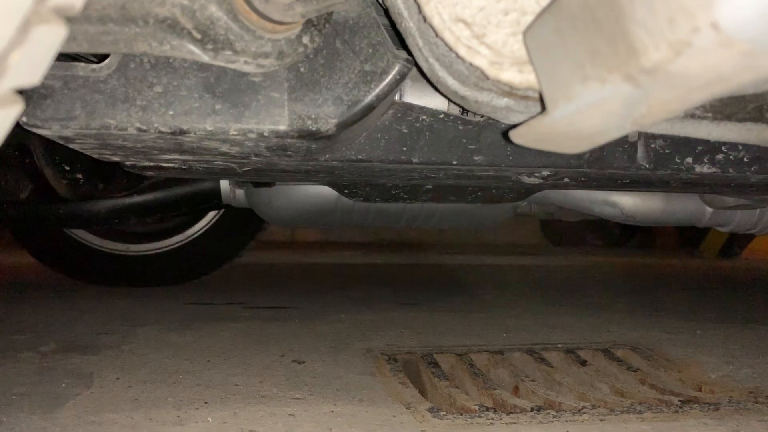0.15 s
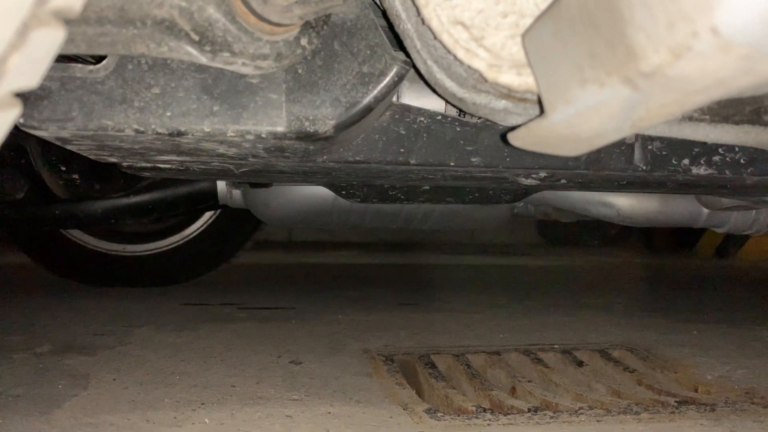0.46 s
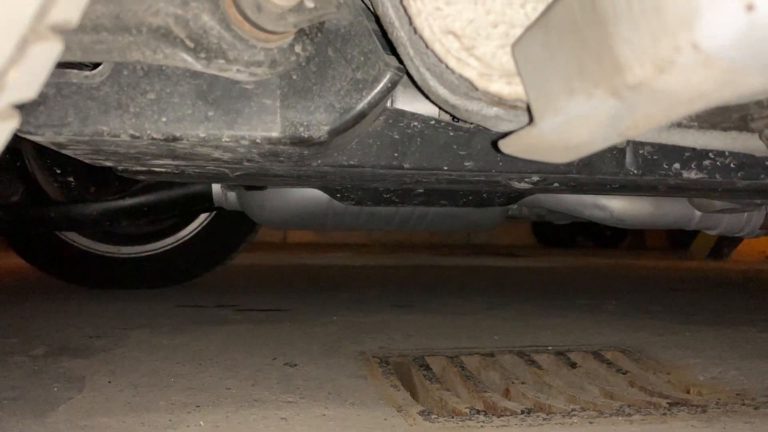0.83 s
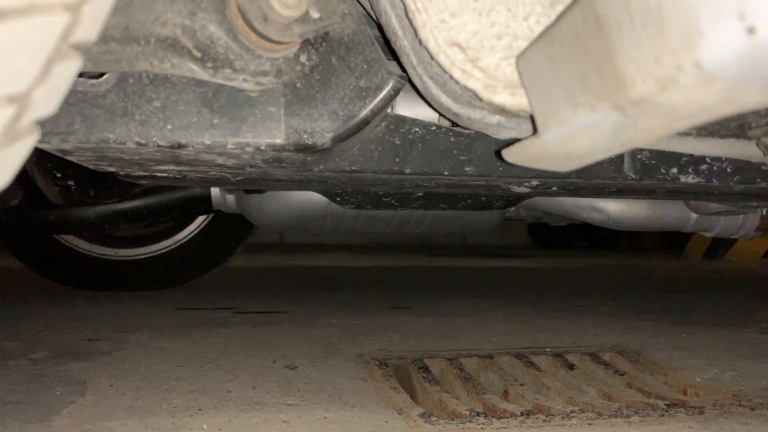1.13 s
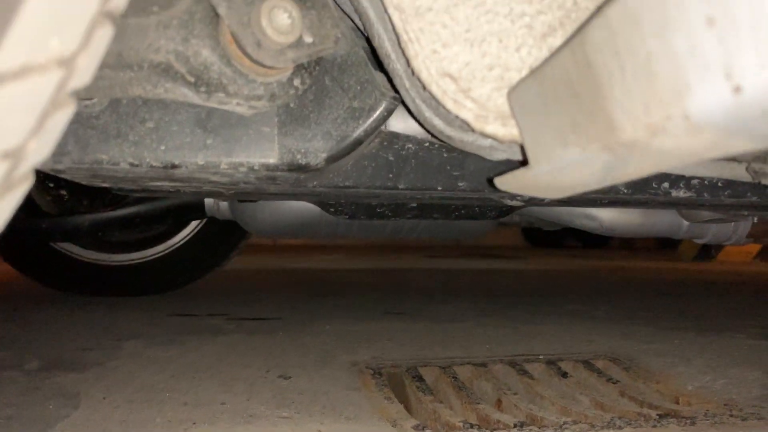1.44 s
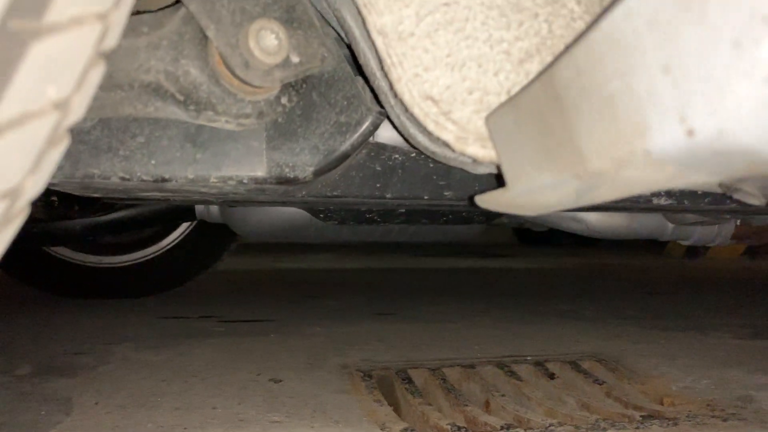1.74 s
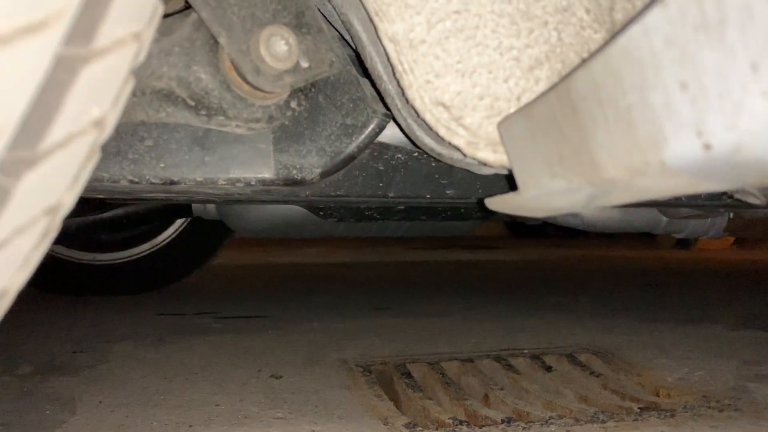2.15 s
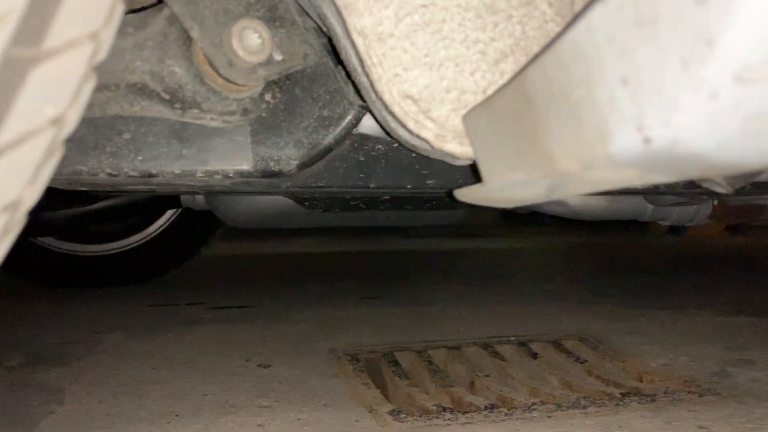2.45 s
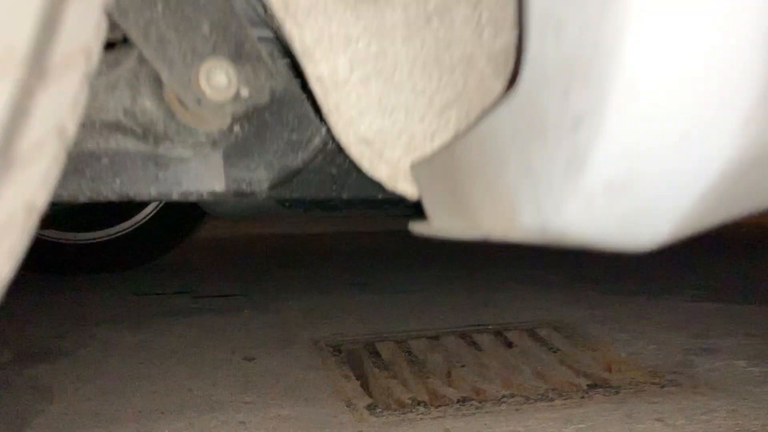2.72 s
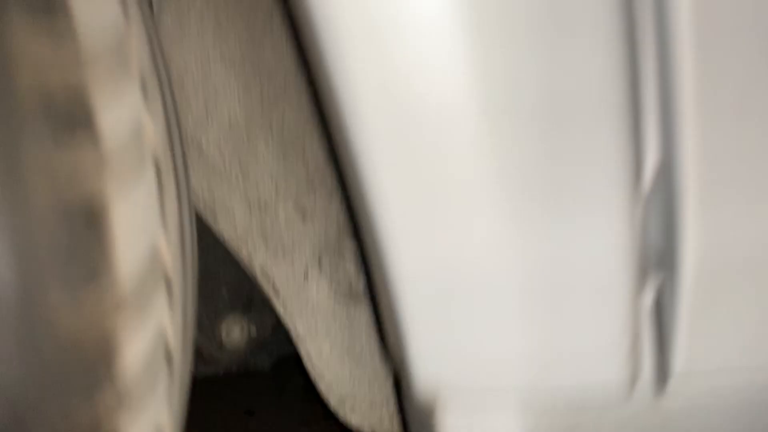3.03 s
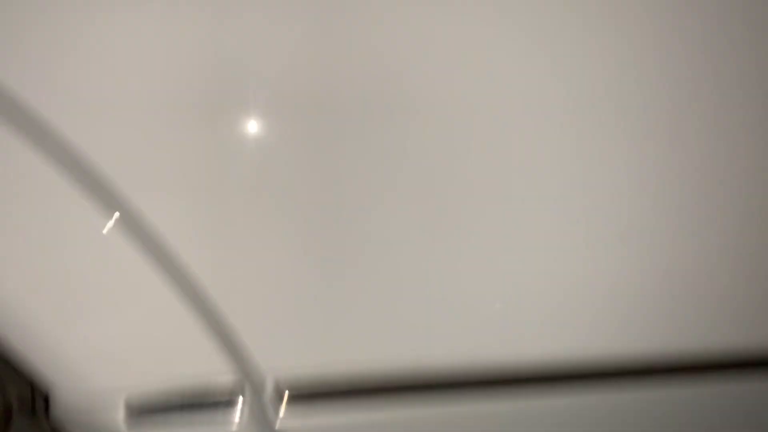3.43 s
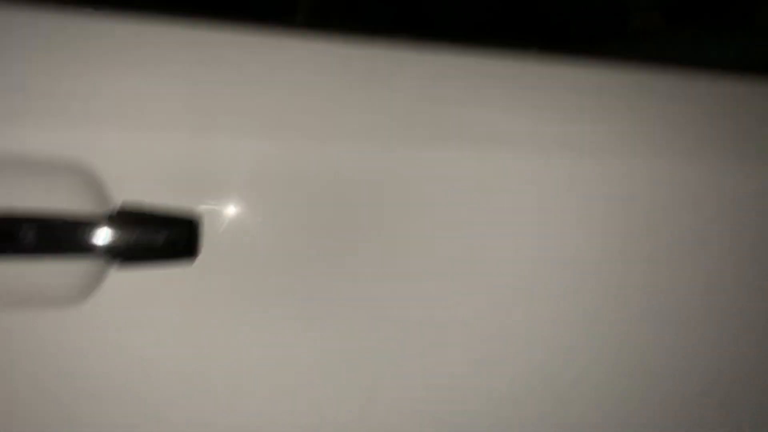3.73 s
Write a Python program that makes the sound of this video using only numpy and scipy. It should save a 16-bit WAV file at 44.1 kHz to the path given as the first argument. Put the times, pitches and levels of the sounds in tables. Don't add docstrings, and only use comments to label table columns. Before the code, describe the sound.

A parked car hums with a deep wavering drone, pump throb and rushing, hissing air, heard close beneath the wheel arch in a garage; near the end the phone lifts away and the sound drops, with a brief hand scuff.

```python
import sys
import numpy as np
from scipy import signal
from scipy.fft import rfft, irfft, next_fast_len
from scipy.io import wavfile
from scipy.ndimage import uniform_filter1d

SR = 44100
rng = np.random.default_rng(int(sys.argv[2]) if len(sys.argv) > 2 else 0)


def amplitude_ratio(level_db):
    exponent = np.asarray(level_db, float) / 20
    return 10 ** exponent


def generate_wav(signal):
    frames = np.transpose(np.atleast_2d(signal))
    scaled = np.clip(frames, -1, 1) * 32767
    pcm = np.round(scaled).astype(np.int16)
    wavfile.write(sys.argv[1], SR, pcm)


N = 171108

# (time [s], level [dB])
NEARNESS = [
    (0, 1.5),
    (1.5, 0.5),
    (2.4, 0.5),
    (2.8, -1),
    (3.05, -4),
    (3.3, -3.5),
    (3.55, -13),
    (3.88, -16.5),
]


def evened(x):
    return x / np.sqrt(np.mean(x ** 2) + 1e-20)


def read(points, hz):
    f, value = np.transpose(points)
    return np.interp(np.log(hz + 1), np.log(f + 1), value)


def curve(points, t):
    return np.interp(t, *np.transpose(points))


def drift(rate_hz, t):
    f = np.geomspace(rate_hz / 20, rate_hz, 20)
    phase = rng.random(20)
    coarse = np.linspace(0, t[-1], 800)
    waves = np.sin(2 * np.pi * (f * coarse[:, None] + phase)) / np.sqrt(f)
    return np.interp(t, coarse, evened(waves.sum(1)))


def resonate(x, hz, width):
    turn = np.exp(2j * np.pi * hz * np.arange(x.shape[-1]) / SR)
    r = np.exp(-np.pi * width * 1.55 / SR)
    return 2 * (turn * signal.lfilter([(1 - r) ** 2], [1, -2 * r, r * r], x / turn)).real


def ripple(size, smooth):
    return 3 * evened(uniform_filter1d(rng.standard_normal(size), size=smooth))[:, None]


def random_spectrum(level_db, size):
    real, imaginary = rng.standard_normal((2, 2, *level_db.shape))
    z = (real + 1j * imaginary) * amplitude_ratio(level_db) * np.sqrt(SR / size * 1.5)
    return signal.istft(z, nperseg=size, noverlap=size * 3 // 4)[1][:, :N]


def gusty_level(db, share, t):
    return amplitude_ratio(db + share * curve(NEARNESS, t) + 2.05 * drift(8, t))


def drone(t):
    # (time [s], frequency [Hz])
    drone_hz = [(0, 42.5), (.2, 45.05), (.27, 46.5), (.34, 42.35), (.85, 43.42), (1.2, 42.9), (1.45, 44.5),
                (1.65, 42.4), (1.9, 44), (2.15, 43.73), (2.5, 43.57), (2.8, 43.5), (3, 43.1), (3.88, 43.25)]
    # (time [s], level [dB])
    drone_db = [(0.0, -21), (0.05, -21.5), (0.18, -27), (0.45, -20), (0.62, -21), (1.1, -19), (1.3, -20.5),
                (1.38, -24), (1.54, -24.5), (1.65, -20), (1.8, -21), (2.11, -26), (2.46, -22), (2.77, -23),
                (3.01, -20), (3.77, -21), (3.84, -20), (3.88, -19)]
    cycles = np.cumsum(curve(drone_hz, t)) / SR
    return np.sqrt(2) * amplitude_ratio(curve(drone_db, t)) * np.sin(2 * np.pi * (cycles + 0.26))


def pump(t):
    # (shaft multiple, level [dB], share of load)
    orders = [(.593, -45, 0), (1, -44, .1), (2, -45, .2), (3, -46.5, .2), (4, -42.5, 1), (9, -49, .2),
              (12.5, -53, .2), (18, -57, .2)]
    # (time [s], level [dB])
    load_db = [(0, 3.5), (.22, -2), (.4, 2.5), (.68, 0), (.8, 1), (1.05, -11), (1.15, 2), (1.42, -2.5),
               (1.75, 3), (2.0, -1), (2.08, -3), (2.2, 0.5), (2.55, 3.5), (2.7, -2.5), (2.88, 5),
               (3.0, -10), (3.88, -4)]
    shaft_hz = 49.07 * (1 + 0.00404 * drift(3.496, t))
    turns = np.cumsum(shaft_hz) / SR
    load = curve(load_db, t)
    lines = np.zeros(N)
    for multiple, db, share in orders:
        swell = amplitude_ratio(db + share * load + 1.5 * drift(5.37, t))
        lines += swell * np.sin(2 * np.pi * (multiple * turns + rng.random()))
    return np.sqrt(2) * lines * amplitude_ratio(0.15 * curve(NEARNESS, t))


def whines(t):
    # (frequency [Hz], level [dB])
    motor_tones = [(1145, -48.5), (2738, -58), (2951, -63), (5756, -65)]
    tone = np.zeros(N)
    for hz, db in motor_tones:
        jittered = t + .00004 * drift(3.77, t)
        tone += amplitude_ratio(db + 4 * drift(7.45, t)) * np.sin(2 * np.pi * hz * jittered)
    balance = np.array([1.2 + 0 * t, np.clip((t - 2.9) * 5, -.9, .5)])
    return np.sqrt(2) * tone * amplitude_ratio(1.3 * curve(NEARNESS, t)) * balance


def surges(t):
    # (time [s], level [dB], frequency [Hz], spread [s])
    main_swells = [(0.047, -32, 396, 0.015), (0.082, -29, 395, 0.0062), (0.211, -23, 399, 0.01),
                   (0.275, -35, 420, 0.0066), (0.354, -32.1, 405, 0.0043), (0.446, -28.1, 392, 0.014),
                   (0.556, -29.5, 406, 0.007), (0.595, -31, 420, 0.01), (0.681, -32, 408, 0.0077),
                   (0.727, -27, 402, 0.018), (0.786, -28.5, 395, 0.01), (0.853, -25.5, 396, 0.018),
                   (1.007, -29, 409, 0.0075), (1.07, -27, 387, 0.008), (1.313, -32, 390, 0.009),
                   (1.38, -27.5, 400, 0.0067), (1.432, -26.5, 406, 0.016), (1.51, -32, 394, 0.017),
                   (1.581, -32.4, 417, 0.022), (1.638, -32, 404, 0.013), (1.701, -28, 411, 0.0063),
                   (1.747, -30.5, 394, 0.036), (1.786, -25.5, 400, 0.011), (1.872, -35, 395, 0.019),
                   (2.015, -28.5, 399, 0.016), (2.149, -28.5, 396, 0.011), (2.231, -37, 399, 0.013),
                   (2.296, -32.5, 410, 0.011), (2.357, -25, 396, 0.012), (2.532, -32.4, 396.5, 0.023),
                   (2.654, -24, 394, 0.022), (2.69, -31.5, 407, 0.022), (2.888, -31.5, 405, 0.013),
                   (2.923, -33.8, 406, 0.012), (3.015, -37, 404, 0.0068), (3.05, -38.3, 391, 0.0083),
                   (3.121, -39.3, 395, 0.021), (3.198, -41, 417, 0.012), (3.264, -46, 396.7, 0.017),
                   (3.346, -37.4, 407, 0.011), (3.402, -44, 405.4, 0.008), (3.445, -36, 380, 0.007),
                   (3.505, -43.5, 386, 0.027), (3.57, -44, 394, 0.023), (3.641, -42.1, 422, 0.008),
                   (3.697, -37, 406, 0.0054), (3.799, -37, 391, 0.017), (3.859, -45, 391.7, 0.02)]
    # (time [s], level [dB], frequency [Hz], spread [s])
    low_swells = [(0.136, -38.5, 286, 0.028), (0.374, -46, 297, 0.014), (0.566, -39.5, 281, 0.018),
                  (0.709, -42, 296, 0.011), (0.907, -51, 302, 0.012), (1.028, -40.3, 292, 0.0099),
                  (1.183, -45, 283, 0.014), (1.254, -47, 300, 0.025), (1.33, -39, 316, 0.015),
                  (1.504, -39.5, 299, 0.015), (1.575, -42, 284, 0.017), (1.779, -43, 304, 0.018),
                  (1.881, -43, 290, 0.012), (2.001, -36.5, 290, 0.013), (2.082, -41, 289, 0.025),
                  (2.204, -45, 300, 0.019), (2.299, -36, 290, 0.0098), (2.402, -37, 287, 0.012),
                  (2.618, -35.1, 285, 0.016), (2.731, -35.6, 297, 0.0092), (2.795, -46, 295, 0.023),
                  (2.888, -39.9, 284.2, 0.013), (3.028, -40, 286, 0.029), (3.128, -51, 293, 0.021),
                  (3.219, -46, 292, 0.014), (3.305, -51, 286, 0.013), (3.421, -40, 293, 0.014),
                  (3.568, -50, 295, 0.013), (3.634, -49.1, 290, 0.015), (3.813, -47, 297, 0.026)]
    out = np.zeros(N)
    for s, db, hz, spread in main_swells + low_swells:
        span = slice(max(round((s - 4 * spread) * SR), 0), round((s + 4 * spread) * SR))
        since = t[span] - s
        swell = amplitude_ratio(db) * np.exp(-.5 * (since / spread) ** 2)
        out[span] += np.sqrt(2) * swell * np.sin(2 * np.pi * hz * since)
    return out


def roar(t):
    # (frequency [Hz], level [dB per Hz])
    roar_db = [(15, -57), (35, -62), (60, -53), (110, -57.5), (240, -63), (560, -62), (720, -71.5),
               (1500, -79)]
    # (frequency [Hz], share)
    roar_follow = [(60, 0.14), (150, 0.031), (350, 0.46), (1000, 0.58)]
    # (frequency [Hz], width [Hz], level [dB], share of nearness)
    cavities = [(399, 21.6, -41, 1), (290, 53, -51.5, 0.78), (438.7, 9.4, -45, 0.99),
                (2247, 280, -49.5, 0.33), (5245, 46, -57.5, 0.73), (7205, 17, -54.5, 1.3)]
    hz = np.fft.rfftfreq(4096, 1 / SR)[:, None]
    near = curve(NEARNESS, np.arange(N // 1024 + 5) * 1024 / SR)
    hush = -8 * np.exp(-.5 * ((hz - 198) / 16) ** 2)
    level = read(roar_db, hz) + read(roar_follow, hz) * near + ripple(size=2049, smooth=2) + hush
    out = random_spectrum(level, 4096)
    gust = rng.standard_normal((2, N))
    for f, width, db, share in cavities:
        out = out + gusty_level(db, share, t) * evened(resonate(gust, f, width))
    return out


def aimed(t):
    # (frequency [Hz], width [Hz], level [dB], share of nearness, side over mid)
    aimed_cavities = [(585, 68, -49.5, 0.56, 1.6), (849.6, 103, -45.5, 0.28, 0.58),
                      (1119, 81, -47.5, 0.18, 0.67), (1228, 19, -52, 0.59, 0.42),
                      (2763, 156, -55, .9, 0.32)]
    gust = rng.standard_normal((2, N))
    total = np.zeros((2, N))
    for f, width, db, share, wide in aimed_cavities:
        total += gusty_level(db, share, t) * evened(resonate(gust, f, width)) * [[1], [wide]]
    mid, side = total
    return np.array([mid + side, mid - side])


def hiss():
    # (frequency [Hz], level [dB per Hz])
    hiss_db = [(1200, -77.5), (2500, -79.5), (3300, -94.5), (6000, -89.5), (7400, -77), (9500, -79.5),
               (12500, -77), (15400, -71)]
    # (frequency [Hz], share)
    hiss_follow = [(2000, 0.022), (6000, 1.1), (12000, 1.27)]
    # (frequency [Hz], level [dB])
    shadow_db = [(1000, 0), (2000, -5), (3500, -7), (7000, -6), (12000, -2.5)]
    hz = np.fft.rfftfreq(1024, 1 / SR)[:, None]
    t = np.arange(N // 256 + 5) * 256 / SR
    patches = rng.standard_normal((513, len(t)))
    patches = uniform_filter1d(patches, size=12, axis=0)
    patches = evened(uniform_filter1d(patches, size=14, axis=1))
    shadowed = 1 / (1 + np.exp(np.clip((3.385 - t) / .015, -50, 50)))
    level = read(hiss_db, hz) + read(hiss_follow, hz) * curve(NEARNESS, t)
    level = level + 0.76 * patches - 1.1 * drift(29.85, t)
    level = level + 0.54 * ripple(size=513, smooth=1) + read(shadow_db, hz) * shadowed
    return random_spectrum(level, 1024)


def scuffs(t):
    # (time [s], length [s], level [dB], ringing share)
    rubs = [
        (3.63, .03, -43, .7),
        (3.646, .026, -35.5, .9),
        (3.664, .012, -32, .6),
        (3.15, .24, -52, .15),
    ]
    # (frequency [Hz], width [Hz], level [dB])
    case_modes = [(1270, 260, 2), (2090, 170, 3), (3300, 900, -9), (4600, 600, -9), (7000, 2500, -10)]
    a, b = rng.standard_normal((2, N))
    likeness = .93
    rub = np.array([a, likeness * a + np.sqrt(1 - likeness ** 2) * b])
    body = evened(sum(amplitude_ratio(db) * evened(resonate(rub, f, width)) for f, width, db in case_modes))
    dull = evened(resonate(rub, 2100, 4720))
    out = np.zeros((2, N))
    for s, length, db, ring in rubs:
        stroke = np.sin(np.pi * np.clip((t - s) / length, 0, 1))
        out += amplitude_ratio(db) * stroke * (ring * body + (1 - ring) * dull)
    return out


def garage():
    return amplitude_ratio(-56) * evened(resonate(rng.standard_normal((2, N)), 4800, 3500))


def ports(direct, other):
    # (frequency [Hz], coherence [0-1])
    port_likeness = [(60, 1), (200, 0.83), (400, 0.78), (700, 0.35), (1150, 0.64), (3500, 0.08),
                     (6300, 0.44), (7500, 1)]
    # (frequency [Hz], phase [turns])
    left_lag = [(0, 0), (400, .04), (700, .3), (2000, .5), (4200, 1), (5800, 1.5), (7250, 2), (10400, 2.5),
                (13600, 3), (15700, 3.37)]
    # (frequency [Hz], level [dB])
    left_lean = [(200, -3), (400, 3), (900, -1.2), (2500, 3), (4000, 1.5), (6000, -4), (7000, 0)]
    size = next_fast_len(N + 2048)
    hz = np.fft.rfftfreq(size, 1 / SR)
    same = np.clip(read(port_likeness, hz), 0, 1)
    lean = amplitude_ratio(read(left_lean, hz) / 2)
    a, b = rfft(direct, size), rfft(other, size)
    lagged = a * np.exp(-2j * np.pi * curve(left_lag, hz))
    left = (same * lagged + np.sqrt(1 - same ** 2) * b) * lean
    return irfft(np.array([left, a / lean]), size)[:, :N]


def scene():
    t = np.arange(N) / SR
    field = hiss() + roar(t)
    tones = pump(t) + surges(t)
    out = ports(field[0] + tones, field[1] + np.roll(tones, shift=37))
    out = out + drone(t) * amplitude_ratio(np.array([[.2], [-.2]]))
    out = out + whines(t) + aimed(t) + garage()
    return out + scuffs(t) * amplitude_ratio(np.array([[.6], [-.6]]))


def low_pass(x):
    return signal.sosfilt(signal.butter(12, 15725, fs=SR, output="sos"), x)


def record(dry):
    # (0 mid or 1 side, from [Hz], to [Hz], share of time kept)
    gapped_bands = [(0, 9690, 10280, 0), (0, 10280, 11000, 0), (1, 6890, 7570, .05), (1, 7570, 7900, .75),
                    (1, 13100, 13850, 0), (1, 13850, 14400, .12)]
    passing_s = [.1, .15, .265, .66, .825, .85, 1.265, 1.96, 2.08, 2.17, 2.48, 2.68, 2.75, 2.91]
    mid_side = np.array([dry[0] + dry[1], dry[0] - dry[1]]) / 2
    hz, t, z = signal.stft(mid_side, SR, nperseg=2048)
    gain = np.ones(z.shape) * (hz < 15730)[:, None]
    luck = rng.random((len(t), len(gapped_bands)))
    for k, (channel, lo, hi, share) in enumerate(gapped_bands):
        gain[channel, (hz > lo) & (hz <= hi)] = luck[:, k] < share
    _, lo, hi, _ = gapped_bands[0]
    passing = abs(t[:, None] - np.array(passing_s)).min(1) < .017
    gain[0, (hz > lo) & (hz <= hi)] = 2.2 * passing
    mid, side = signal.istft(z * gain, SR, nperseg=2048)[1][:, :N]
    return low_pass(np.array([mid + side, mid - side]))


dry = scene()
out = record(dry)
generate_wav(out)
```